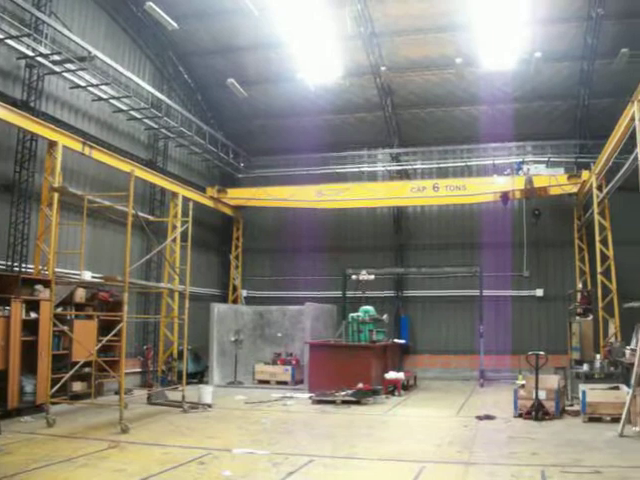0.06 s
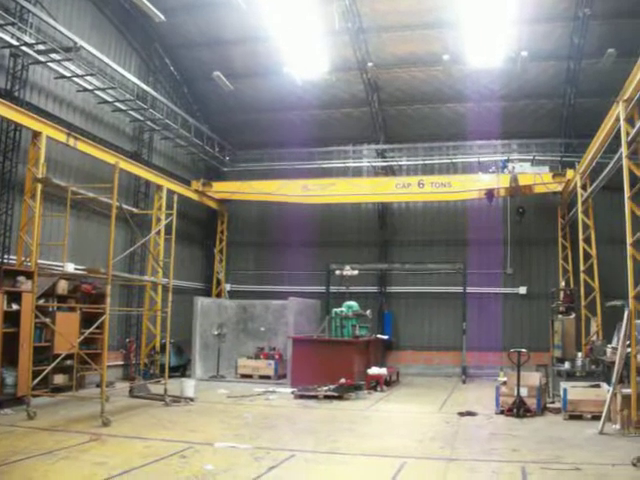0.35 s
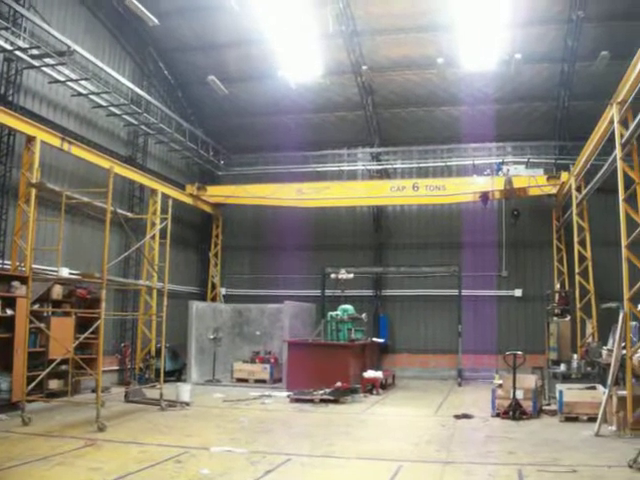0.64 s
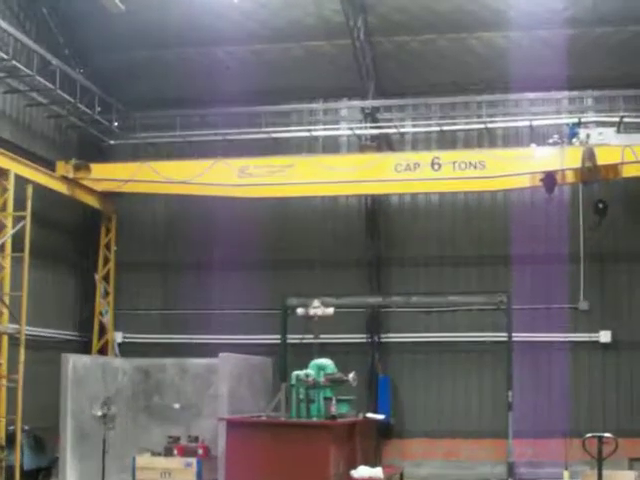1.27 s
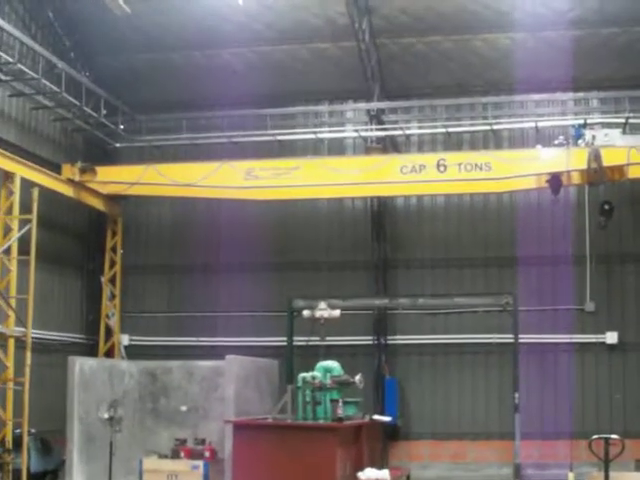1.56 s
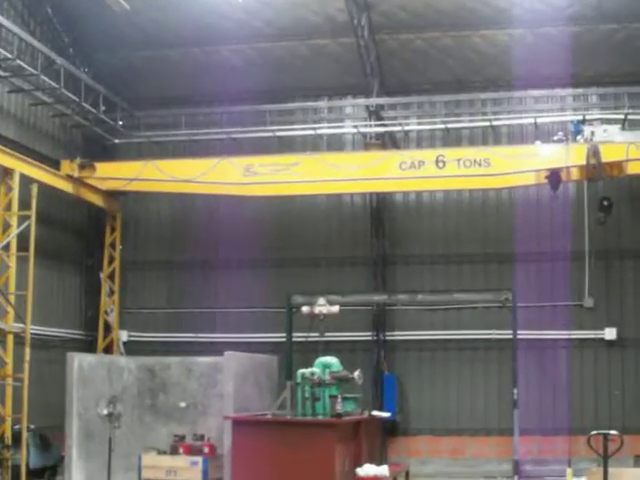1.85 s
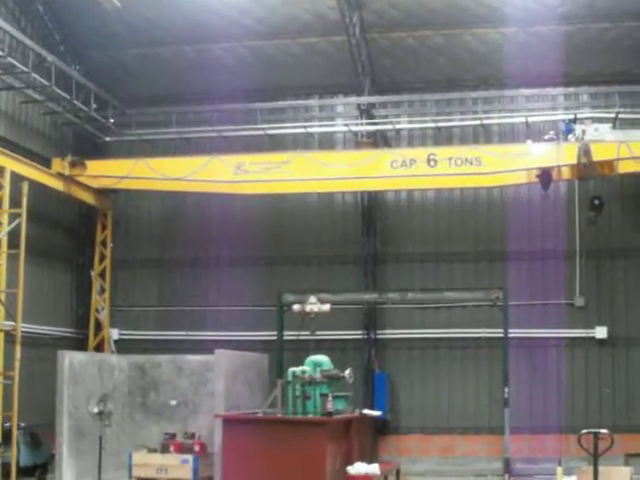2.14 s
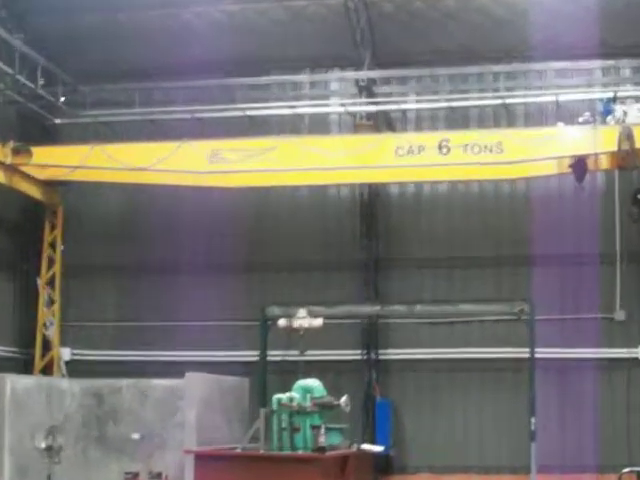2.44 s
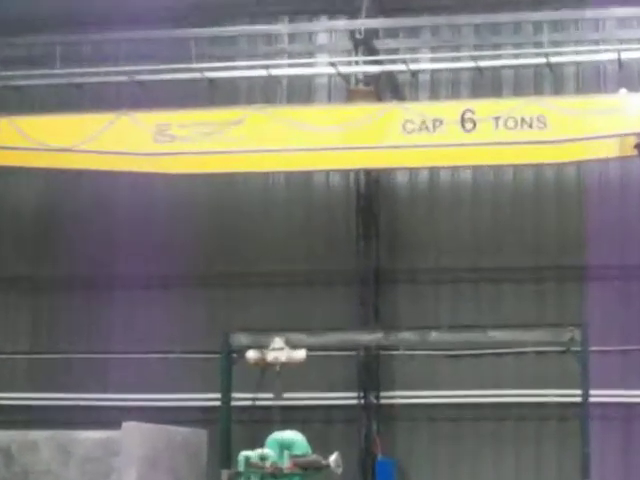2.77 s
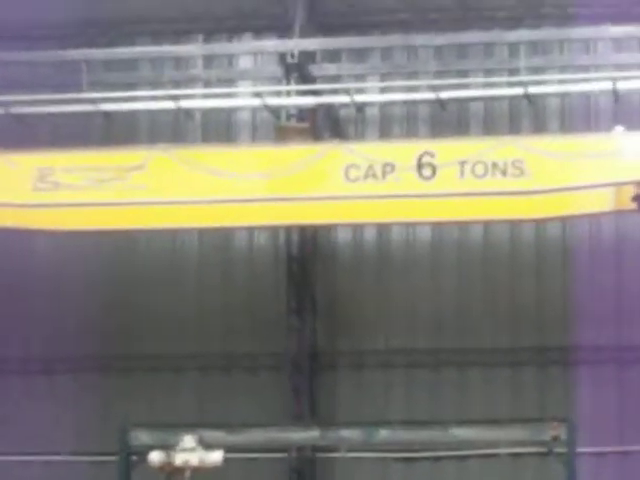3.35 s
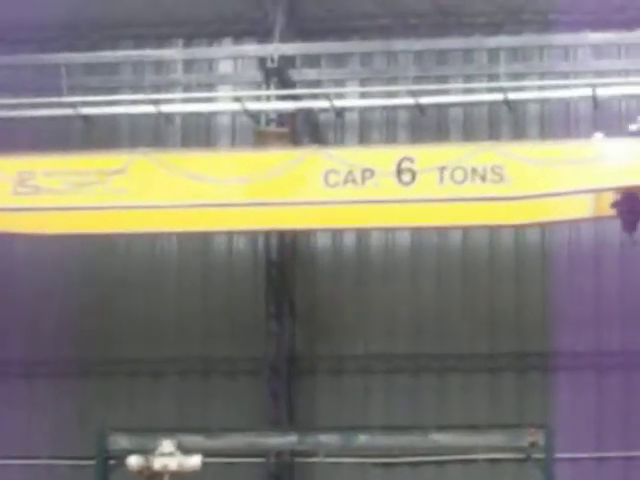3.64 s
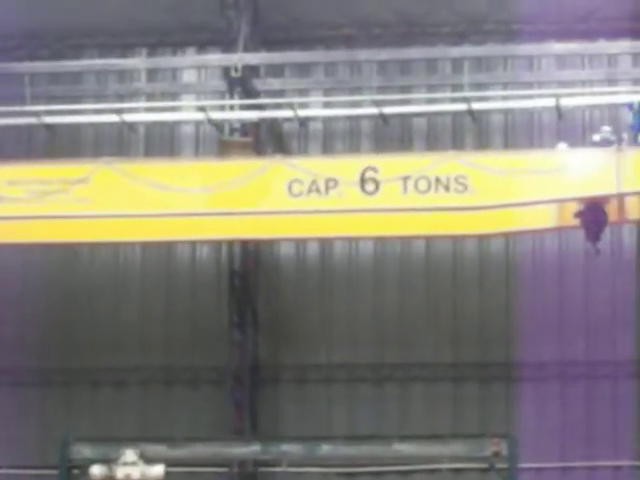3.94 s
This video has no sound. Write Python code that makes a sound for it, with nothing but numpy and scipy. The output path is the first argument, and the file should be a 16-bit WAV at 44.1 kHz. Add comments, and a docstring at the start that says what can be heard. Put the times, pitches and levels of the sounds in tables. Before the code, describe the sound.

Ventilation roars steadily through a large factory hall for the whole four seconds, with faint distant motor hums and whines beneath. From 0.2 to 0.8 seconds, a plastic case gives tiny squeaks right at the microphone. Dull finger taps land at about 0.3, 0.4, 1.1, 2.2 and 3 seconds. Around 3.3 seconds a far valve puffs compressed air, which dies away slowly in the hall.

```python
"""Ventilation roars through a large factory hall, a steady rush of air all around the microphone.
Right at the microphone, the plastic case of a handheld device sticks and slips in the grip with tiny
squeaks, and fingers give it a few dull taps. Near the end a far valve lets off a puff of compressed
air, which dies away slowly in the hall. In the background, distant motors hum and whine faintly."""
import sys
import numpy as np
from scipy import signal
from scipy.fft import rfft, irfft
from scipy.io import wavfile

SR = 44100
rng = np.random.default_rng(int(sys.argv[2]) if len(sys.argv) > 2 else 0)


def waveform_to_disk(signal):
    """Save audio, clipped to [-1, 1], as 16-bit WAV at the path in sys.argv[1]."""
    frames = np.transpose(np.atleast_2d(signal))
    scaled = np.clip(frames, -1, 1) * 32767
    samples = np.round(scaled).astype(np.int16)
    wavfile.write(sys.argv[1], SR, samples)


N = 176400
TIME = np.arange(N) / SR
BIN_HZ = np.arange(N // 2 + 1) * SR / N


def from_db(db):
    """Decibels to gain."""
    return 10 ** (np.asarray(db) / 20)


def unit_rms(x):
    """Scale to an rms of 1."""
    return x / np.sqrt(np.mean(x ** 2) + 1e-20)


def at_hz(points, hz):
    """Read a table on a log-frequency axis."""
    freqs, values = np.transpose(points)
    return np.interp(np.log(np.maximum(hz, 1)), np.log(freqs), values)


def drift(rate_hz):
    """Smooth random wander of rms 1, mostly slower than rate_hz."""
    return unit_rms(irfft(rfft(rng.standard_normal(N)) / (1 + (BIN_HZ / rate_hz) ** 2), N))


def sine(hz):
    """A tone that follows a pitch curve."""
    return np.sin(2 * np.pi * np.cumsum(hz) / SR)


def noise_bands(spectrum):
    """Coloured noise of rms 1 in overlapping half-octave bands: yields (centre_hz, band)."""
    coloured = rfft(rng.standard_normal(N)) * from_db(at_hz(spectrum, BIN_HZ))
    whole = rfft(unit_rms(irfft(coloured, N)))
    centres = np.geomspace(35, 6000, 16)
    for centre_hz, shares in zip(centres, np.eye(len(centres))):
        window = at_hz(list(zip(centres, shares)), BIN_HZ)
        yield centre_hz, irfft(whole * window, N)


def add(out, start_s, sound):
    """Mix a short sound in at start_s."""
    i = int(start_s * SR)
    out[i:i + len(sound)] += sound[:N - i]


# Spectrum of the roar, all around the microphone: freq_hz, relative_density_db
ROAR_SPECTRUM = [(10, -19.5), (28, -1.5), (50, -7), (85, -1.5), (130, -9.5), (240, -11), (330, -14),
                 (500, -16.5), (700, -13.5), (1050, -9), (1700, -14.5), (2200, -20.5), (3300, -26.5),
                 (4700, -31.5), (5400, -40), (6100, -58), (7000, -81)]

def ventilation(level_db=-30.5, flicker_db=0.95):
    """Moving air fills the hall with a steady roar, each band flickering slightly."""
    bands = (band * from_db(flicker_db * drift(8.9)) for _, band in noise_bands(ROAR_SPECTRUM))
    return from_db(level_db) * sum(bands)


# Slips of the grip, right at the microphone:
# start_s, length_s, level_db, pitch_hz, wobble_ratio, low_mode_gain, low_mode_hz, top_mode_gain
GRIP_SLIPS = [(0.2115, 0.0024, -5.5, 3380, 0.051, 0.38, 1600, .25),
              (.3330, 0.0038, -4, 3280, 0.017, 0.043, 1930, 0.11),
              (.3775, 0.0021, -19.5, 3450, .05, .05, 1950, 0.27),
              (.3875, 0.0041, -13, 3530, 0.047, 0.042, 1950, .22),
              (0.404, 0.0058, -15.5, 3500, 0.085, 0.48, 1900, .1),
              (0.4092, 0.0046, -14.5, 3390, 0.11, 0.5, 2170, .25),
              (0.5276, 0.0079, -17.5, 3490, 0.098, .2, 1950, 0.13),
              (.5285, .026, -23, 3940, 0.012, 0.76, 1970, .02),
              (0.5483, 0.0047, -20.5, 3500, 0.063, .2, 2200, .05),
              (0.5616, .003, -11.5, 3290, .04, 0.43, 2030, .02),
              (0.5626, 0.0065, -21, 3570, 0.036, 0.35, 2370, .02),
              (0.6807, 0.0034, -13, 3110, 0.07, 0.62, 2130, .05),
              (0.682, 0.0085, -20.5, 3200, 0.097, 0.53, 1910, .05),
              (0.689, 0.0025, -17.5, 3500, 0.039, 0.28, 2400, .05),
              (0.807, .004, -31, 3320, .04, .1, 1950, .05)]

def case_squeaks(rise_share=0.14, rasp_depth=0.17, top_mode_hz=4730):
    """Plastic sticks and slips: each slip is a tiny unsteady tone that drives two modes of the case."""
    out, wobble, rasp = np.zeros(N), drift(780), drift(830)
    for start_s, length_s, db, hz, wobble_ratio, low_gain, low_hz, top_gain in GRIP_SLIPS:
        span = int(start_s * SR) + np.arange(int(length_s * SR))
        t = TIME[:len(span)]
        tone = sine(hz * (1 + wobble_ratio * wobble[span]))
        low_mode = low_gain * np.sin(2 * np.pi * low_hz * t)
        top_mode = top_gain * np.sin(2 * np.pi * top_mode_hz * t)
        ramp = np.interp(t / length_s, [0, rise_share, 1], [0, 1, 0])
        envelope = np.sin(np.pi / 2 * ramp) ** 2 * (1 + rasp_depth * rasp[span])
        add(out, start_s, from_db(db) * envelope * (tone + low_mode + top_mode))
    return out


# Modes of the plastic case, the low thud first: pitch_hz, level_db, t60_s
CASE_MODES = [(190, -8, 0.015), (730, -1, 0.0073), (1290, 1, 0.0017)]
# Fingers on the case, right at the microphone: start_s, peak_db, cutoff_hz, thud_db
FINGER_TAPS = [(.3335, -13.5, 990, 11), (.4403, -6.5, 3000, -7), (1.1025, -8.5, 790, 1.5),
               (2.1961, -6.5, 2580, -18), (2.9988, -7.5, 620, 0)]

def case_taps():
    """A finger sets off the heavily damped modes of the case; a softer contact gives less treble."""
    out, t = np.zeros(N), TIME[:SR // 20]
    thud, *upper = [np.cos(2 * np.pi * hz * t) * from_db(db - 60 * t / t60) for hz, db, t60 in CASE_MODES]
    for start_s, peak_db, cutoff_hz, thud_db in FINGER_TAPS:
        softness = signal.butter(2, cutoff_hz, fs=SR, output="sos")
        knock = signal.sosfilt(softness, from_db(thud_db) * thud + sum(upper))
        add(out, start_s, -from_db(peak_db) * knock / np.abs(knock).max())
    return out


# Far across the hall, the valve leaks, cracks open, then blows: start_s, level_db, decay_s
VALVE_PUFFS = [(3.222, -35, 0.018), (3.256, -30, 0.024), (3.282, -22.5, 0.032)]
# Spectrum of that air as it reaches the microphone: freq_hz, relative_density_db
PUFF_SPECTRUM = [(100, -19.5), (200, 13), (280, -3), (550, -3), (1100, -0.5), (1700, 2), (2500, -4),
                 (3500, -7), (4800, -8.5), (5500, -19.5), (6100, -34), (7000, -56)]
# Reverberation time of the hall: freq_hz, t60_s
HALL_DECAY = [(200, 2.37), (1200, 1.37), (2600, 3.7), (5200, 2.06)]

def air_valve(tilt_db_per_octave=1.3, pivot_hz=1500, build_s=0.042):
    """Short, bright jets of compressed air; the hall's reverberation builds and dies band by band."""
    out = np.zeros(N)
    for hz, band in noise_bands(PUFF_SPECTRUM):
        brightness = from_db(tilt_db_per_octave * np.log2(hz / pivot_hz))
        power = np.zeros(N)
        for start_s, db, decay_s in VALVE_PUFFS:
            age = np.maximum(TIME - start_s, 0)
            jet = (age > 0) * np.exp(-age / decay_s) * brightness
            tail = from_db(-60 * age / at_hz(HALL_DECAY, hz)) * (1 - np.exp(-age / build_s))
            power += from_db(db) ** 2 * (jet ** 2 + tail ** 2)
        out += band * np.sqrt(power)
    return out


# Motors and fans, far from the microphone: pitch_hz, level_db, line_width_hz
MOTOR_TONES = [(61.5, -42, 1.8), (86.64, -40.5, 5.6), (113.6, -43.5, 1.7), (141, -49.5, 3.3),
               (228, -50.5, 4.5), (334, -54.5, 6.7), (1021, -55, 11), (2820, -64, 6), (3946, -65, 8),
               (4570, -69.5, 4.7), (4800, -71, 8)]
# Distant motor tones that swell and fade once: middle_s, length_s, pitch_hz, level_db
MOTOR_SWELLS = [(.45, 0.99, 4660, -55.5), (1.15, 0.53, 2845, -48.5), (1.95, 1.63, 87.5, -37.5),
                (2.7, .7, 2840, -53.5), (3.1, 0.96, 139, -41)]

def far_motors(waver_db=4):
    """Hums and whines that wander in pitch and strength on their way through the hall."""
    out = np.zeros(N)
    for hz, db, width_hz in MOTOR_TONES:
        tone = sine(hz + width_hz / 2 * drift(2 * width_hz))
        out += from_db(db) * unit_rms(tone * from_db(waver_db * drift(1.6)))
    for middle_s, length_s, hz, db in MOTOR_SWELLS:
        swell = np.cos(np.pi * np.clip((TIME - middle_s) / length_s, -0.5, 0.5))
        out += from_db(db) * swell * unit_rms(sine(hz + 2.5 * drift(8)))
    return out


def scene():
    """One microphone in the hall, with the handling noise right beside it."""
    hall = ventilation() + far_motors() + air_valve()
    return (hall + case_squeaks() + case_taps())[None]


def record(dry, band_edge_hz=6050, overload=0.72):
    """A narrow-band recorder cuts the treble steeply and clips any peak that overloads it."""
    narrow = signal.sosfiltfilt(signal.butter(24, band_edge_hz, fs=SR, output="sos"), dry)
    top_cut = signal.cheby2(12, 70, 16000, fs=SR, output="sos")
    return signal.sosfilt(top_cut, np.clip(narrow, -overload, overload))


dry = scene()
out = record(dry)
waveform_to_disk(out)
```